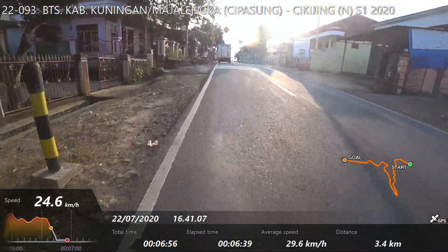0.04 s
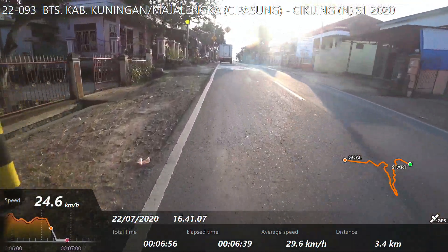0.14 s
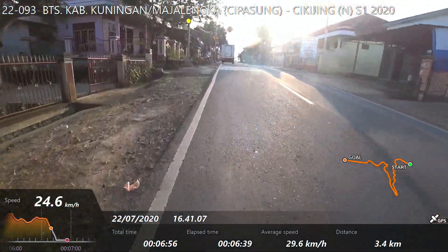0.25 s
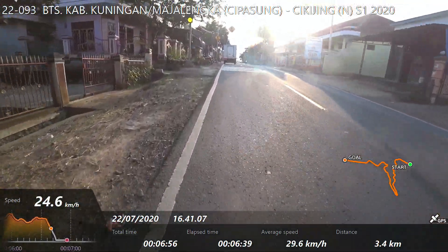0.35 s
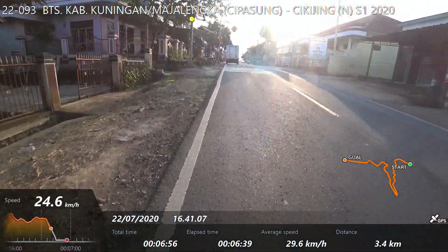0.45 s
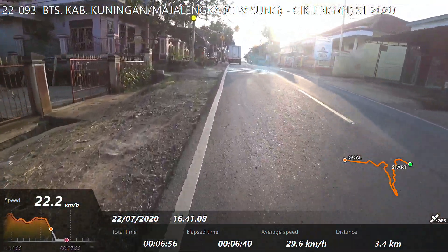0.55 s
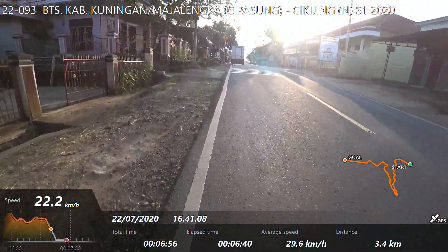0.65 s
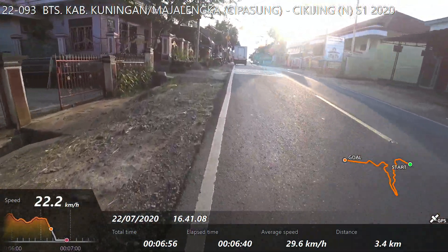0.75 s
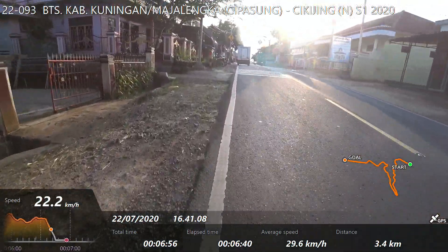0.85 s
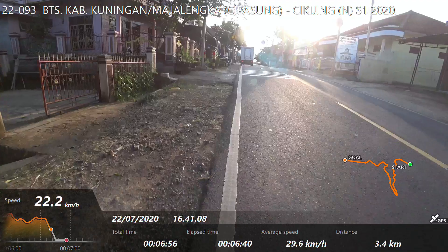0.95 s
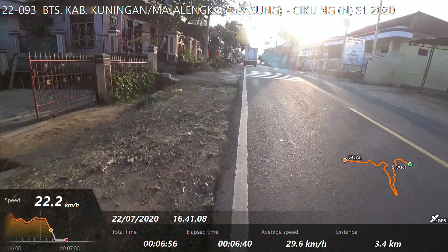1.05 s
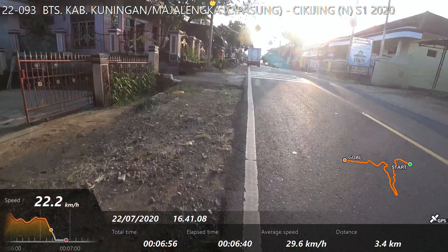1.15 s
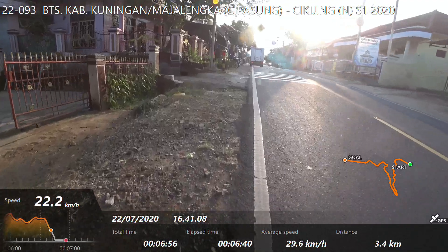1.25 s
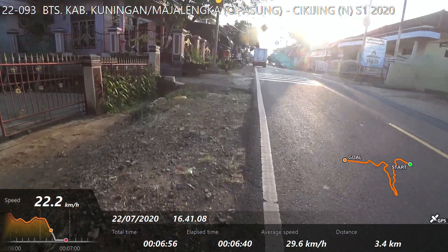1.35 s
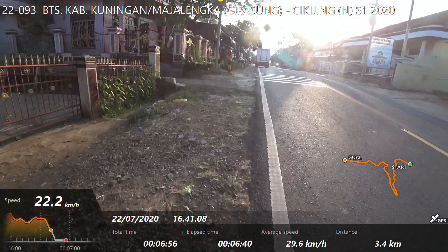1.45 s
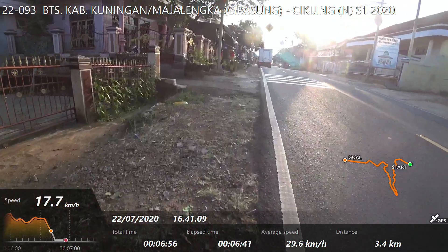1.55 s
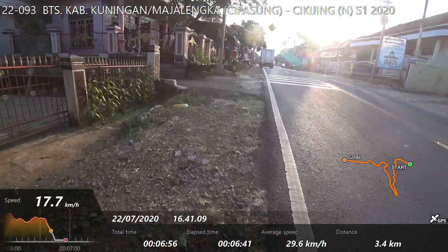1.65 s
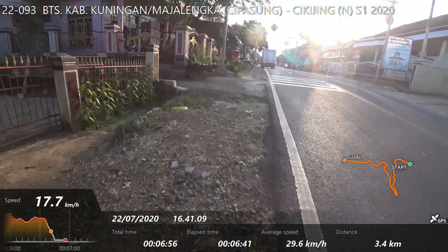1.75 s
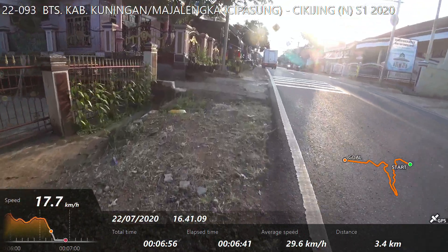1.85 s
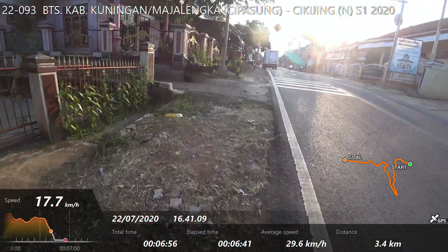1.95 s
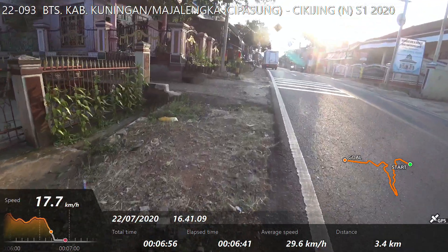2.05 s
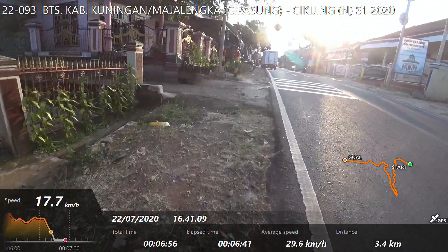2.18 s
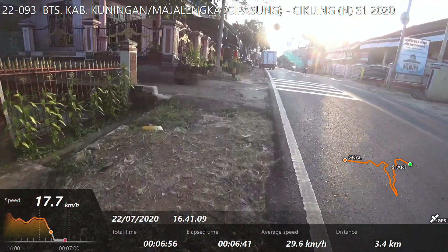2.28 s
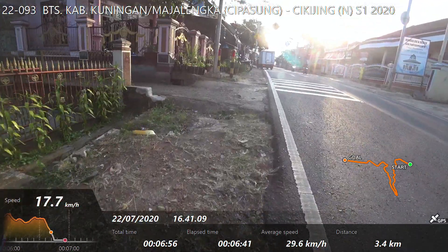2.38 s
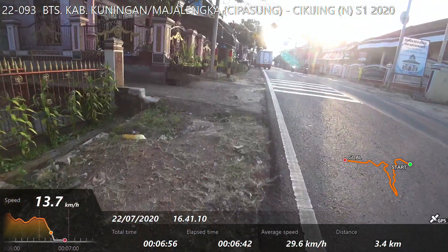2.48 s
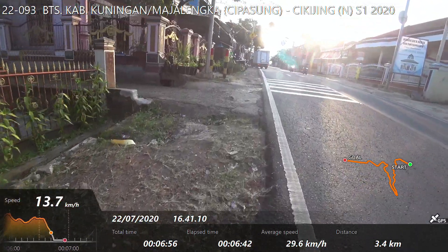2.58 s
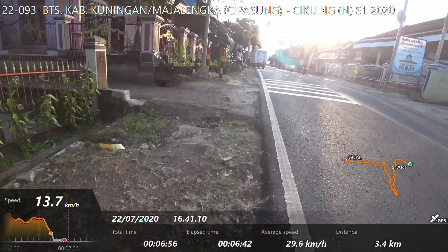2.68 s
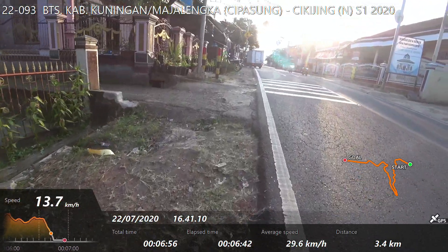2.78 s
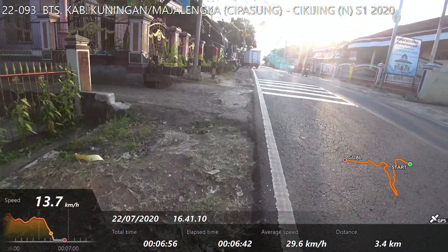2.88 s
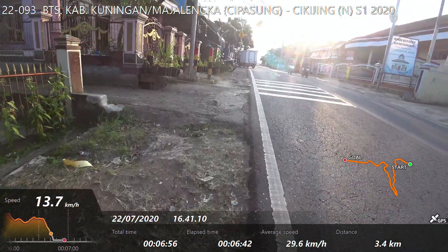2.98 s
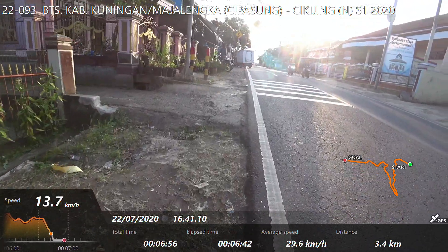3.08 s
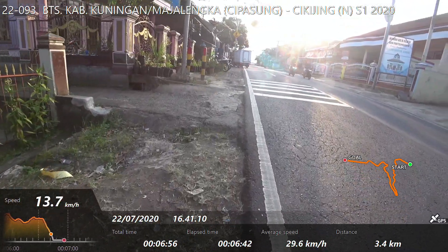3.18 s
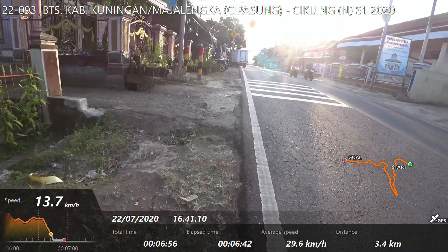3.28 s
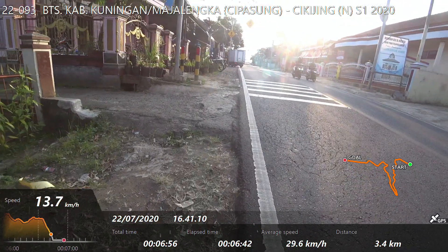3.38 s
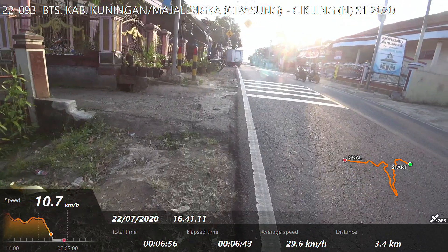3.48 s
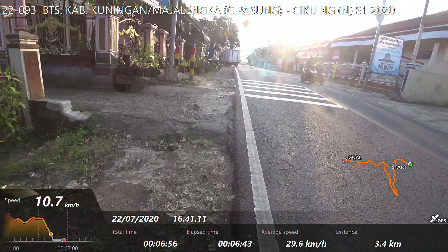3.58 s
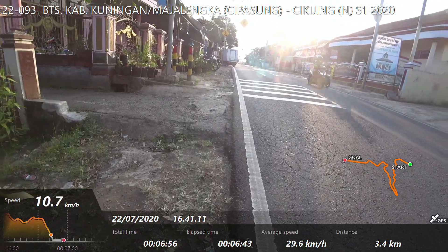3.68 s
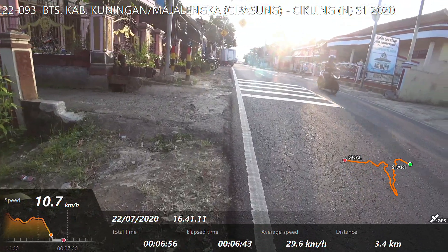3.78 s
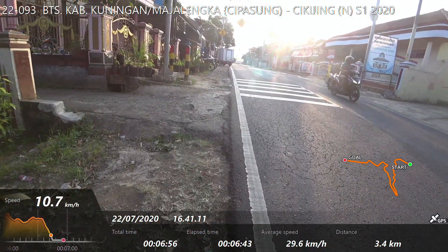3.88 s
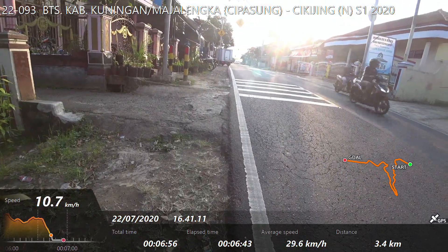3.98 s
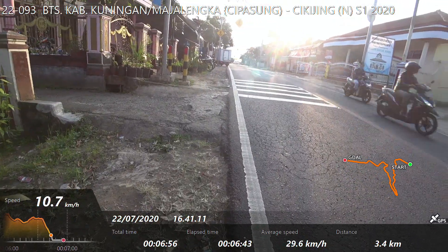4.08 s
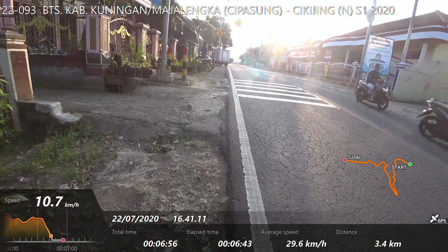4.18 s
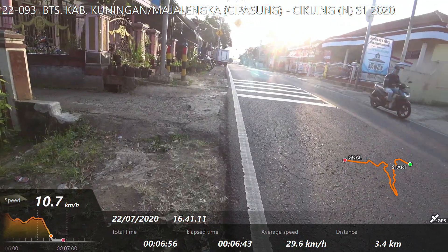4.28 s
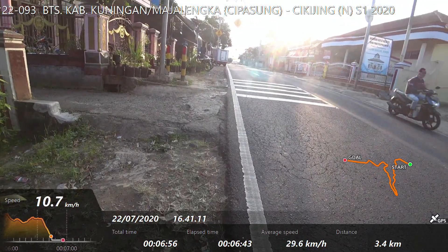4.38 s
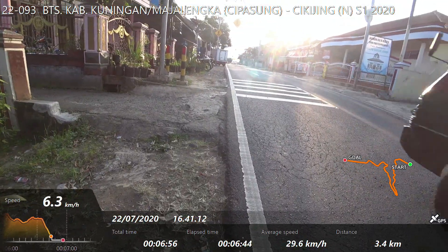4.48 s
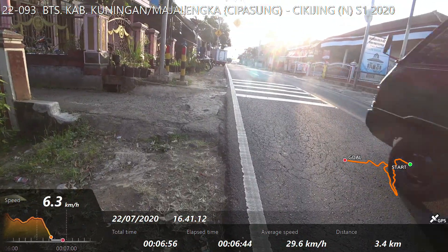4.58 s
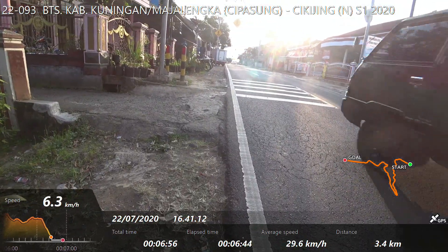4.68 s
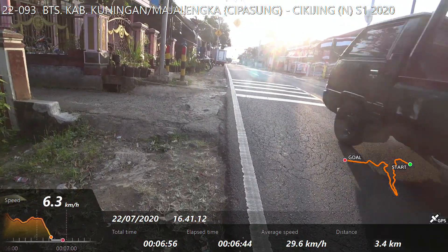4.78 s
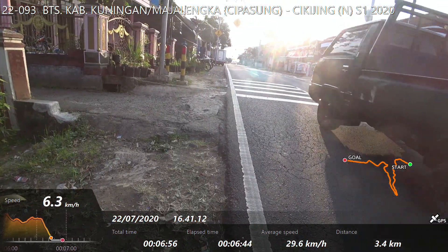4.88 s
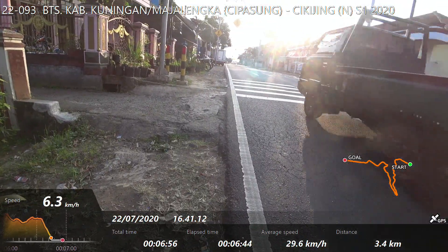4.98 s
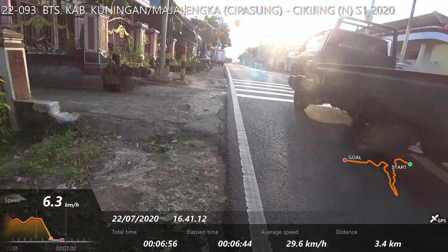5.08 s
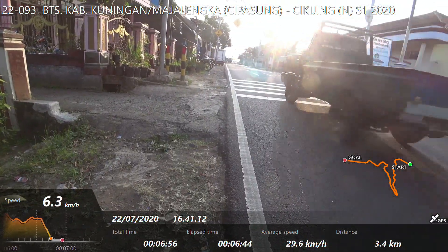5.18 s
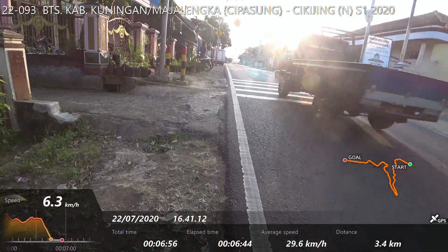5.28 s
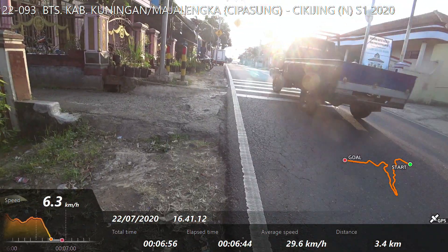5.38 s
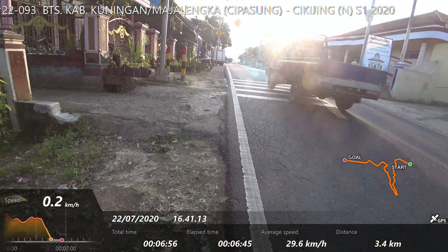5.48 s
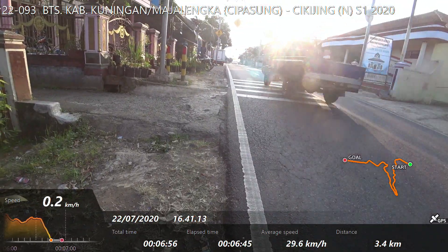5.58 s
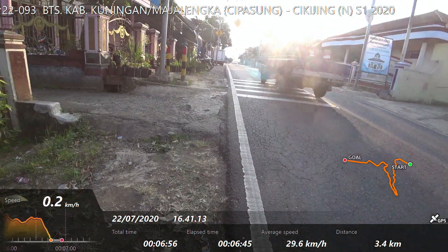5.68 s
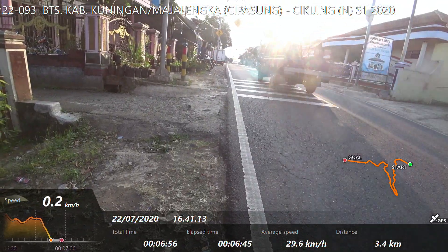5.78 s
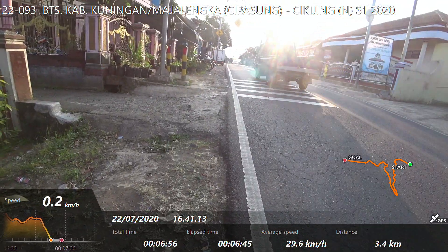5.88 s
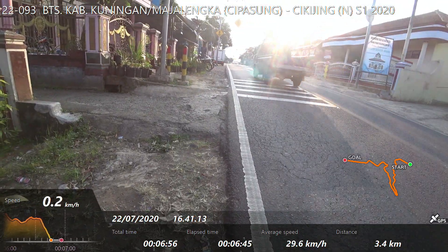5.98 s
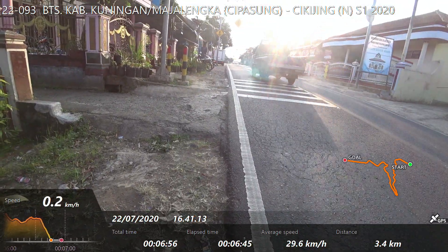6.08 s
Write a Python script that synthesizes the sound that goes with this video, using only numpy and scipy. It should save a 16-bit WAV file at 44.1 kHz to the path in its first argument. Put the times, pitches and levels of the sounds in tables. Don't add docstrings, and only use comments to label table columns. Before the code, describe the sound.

A small sealed camera rides on a two-wheeler on a village road, so sound is muffled, low and boxy. From 0 s an uneven idling throb mixes with tyre rumble, gravel crunch and a few early stone knocks. Around 1.0-1.2 s jolts rattle the housing and a loose clip ticks sharply. The hardest cluster of blunt knocks lands near 1.9-2.05 s, followed by more jolts, clip taps and a faint spring ring at 2.2-3 s. Shaking then eases, with one late knock near 3.9 s. A scooter approaches from about 3 s, buzzing loudest at 4.25 s, then drops slightly in pitch and fades. From 4 s a light truck from behind swells, its droning engine climbing steadily with howl and faint diesel clatter; tyres hiss closest near 5.2 s. It stays loud until 5.8 s, then the throttle lifts and the note falls and stutters at 6 s.

```python
import sys
import numpy as np
from scipy import signal
from scipy.fft import rfft, irfft, next_fast_len
from scipy.io import wavfile
from scipy.ndimage import uniform_filter1d, minimum_filter1d

SR = 44100
rng = np.random.default_rng(int(sys.argv[2]) if len(sys.argv) > 2 else 0)


def to_linear_factor(level_db):
    exponent = np.asarray(level_db, float) / 20
    return 10 ** exponent


def to_wav(s):
    ch = np.atleast_2d(s).T
    pcm = np.round(np.clip(ch, -1, 1) * 32767)
    wavfile.write(sys.argv[1], SR, pcm.astype(np.int16))


N = 270774
FFT_LEN = next_fast_len(N + 8000)
BINS = np.maximum(np.fft.rfftfreq(FFT_LEN, 1 / SR), 1)
TIME = np.arange(N) / SR


def rms_one(x):
    return x / np.sqrt(np.mean(x ** 2) + 1e-20)


def in_time(rows):
    s, *columns = np.transpose(rows)
    return [np.interp(TIME, s, c) for c in columns]


def at_hz(points, hz, axis=1):
    table = np.array(points)
    return np.interp(np.log(hz), np.log(table[:, 0]), table[:, axis])


def drift(rate):
    r = np.exp(-80 * np.pi * rate / SR)
    noise = rng.standard_normal(N // 40 + 2002)
    slow = signal.lfilter([1], [1, -2 * r, r * r], noise)[2000:]
    return np.interp(np.arange(N) / 40, np.arange(len(slow)), rms_one(slow))


def swells(rows):
    t = TIME[::40]
    power = sum(to_linear_factor(2 * db) / (1 + ((t - s) / length) ** 2) ** 2 for s, db, length in rows)
    return np.interp(TIME, t, power)


def resonance(x, hz, width):
    r = np.exp(-np.pi * width / SR)
    poles = [1, -2 * r * np.cos(2 * np.pi * hz / SR), r * r]
    return signal.lfilter([(1 - r * r) / 2, 0, (r * r - 1) / 2], poles, x + 1e-18)


def twice(x, hz, width, second_hz, second_width):
    return resonance(resonance(x, hz, width), second_hz, second_width)


def body(x, modes):
    return sum(to_linear_factor(db) / np.sqrt(width) * twice(x, hz, width, hz, width) for hz, width, db in modes)


def spectrum_of(x):
    return rfft(x, FFT_LEN)


def split(spectrum, tilt_db, lead):
    half = np.atleast_1d(to_linear_factor(tilt_db / 2) * np.exp(.5j * lead))
    return irfft(spectrum * np.array([half, 1 / half]), FFT_LEN)[:, :N]


# t/s, f/Hz, change/dB, length/s
CANCELS = [(1.7, 194, -17, 0.086), (2.5, 50, -10, 0.22), (3.8, 150, -12.5, 0.27), (3.72, 114, -12.5, 0.058),
           (3.94, 120, -9.5, 0.12), (3.86, 350, 6.5, 0.22), (3.64, 107.7, 4, 0.032), (5.92, 160, 6, .1),
           (4.5, 410, -6, 0.072), (4.15, 240, 3.5, .15), (3.6, 65, -4, 0.082), (5.08, 231, -12.5, 0.07),
           (5.8882, 250, -13, 0.025), (5.93, 79, -14, 0.033), (5.35, 560, 2.5, 0.08), (4.85, 371, 6, 0.18),
           (5.0, 610, 9, 0.18), (5.33, 243, 6.5, 0.065), (5.45, 485, -1.5, 0.15), (5.65, 650, 8, 0.23),
           (5.78, 425, -8.5, 0.072), (5.4, 405, -7, 0.1), (5.6, 273, 6, 0.036), (6.05, 230, -1, 0.087),
           (4.75, 350, 5, 0.11), (4.85, 570, -4.5, 0.18), (4.2, 430, -3, 0.1), (6.07, 520, -9, 0.05),
           (6.0, 385, 7.5, 0.061), (5.89, 575, 6.5, 0.027), (5.17, 545, -6.5, 0.05), (6.07, 150, 5, 0.073),
           (6.05, 225, -5.5, 0.025), (3.22, 350, 6.5, 0.075), (3.83, 355, -8, 0.19), (3.66, 237, 2, 0.1),
           (5.02, 530, 5.5, .07), (5.68, 592, -6.5, 0.11), (5.75, 510, 3.5, 0.087), (4.65, 840, 8.5, .06),
           (4.5, 440, 3.5, 0.13), (4.26, 220, -5, .04), (4.75, 145, -5, 0.08), (5.18, 390, 6, .06),
           (2, 73, 4.5, .12), (1.9, 180, 3, 0.065), (6.12, 380, 2, 0.034), (5.5, 325, 8.5, 0.086),
           (3.292, 237, 6.5, 0.049), (3.2, 475, 4, .1)]
CANCEL_OCTAVES = .17


def cancelled(hz):
    t, coarse = TIME[::40], hz[::40]
    change = 0
    for s, centre_hz, db, length in CANCELS:
        octaves_off = np.log2(coarse / centre_hz)
        change = change + db * np.exp(-((t - s) / length) ** 2 - (octaves_off / CANCEL_OCTAVES) ** 2)
    return np.interp(TIME, t, change)


# f/Hz, left minus right/dB, left lead/rad, diffuse share/0-1
PORTS = [(30, 2.5, 1, .05), (130, 3.5, 0.48, 0.18), (310, 3, 1.19, 0.06), (600, 2.5, 1.2, 0.09),
         (1110, 0.5, 1.32, 0.06), (2080, -1, 2.02, .15), (5000, -2, 2.37, 1), (11200, -1, 3, 1)]


def order(hz, multiple, db, wobble_db, rough):
    angle = 2 * np.pi * (multiple * np.cumsum(hz) / SR + rng.random() + rough * drift(10.0))
    side = np.array([[.5], [-.5]])
    tilt = to_linear_factor(side * at_hz(PORTS, multiple * hz))
    lead = side * at_hz(PORTS, multiple * hz, axis=2)
    return np.sqrt(2) * to_linear_factor(db + wobble_db * drift(7.0)) * tilt * np.sin(angle + lead)


def air_noise(colour, flicker_db):
    hiss = rfft(rng.standard_normal((3, FFT_LEN)))
    direct, left, right = hiss * to_linear_factor(at_hz(colour, BINS)) * (BINS < 11060)
    tilt_db, lead = at_hz(PORTS, BINS), at_hz(PORTS, BINS, axis=2)
    share = np.clip(at_hz(PORTS, BINS, axis=3), 0, 1)
    diffuse = split(np.sqrt(share) * np.array([left, right]), tilt_db, 0)
    directed = split(np.sqrt(1 - share) * direct, tilt_db, lead)
    return rms_one(directed + diffuse) * to_linear_factor(flicker_db * drift(6.3))


# t/s, firing f/Hz, level/dB
TRUCK = [(0, 62.09, -38), (1.3, 65.03, -34.5), (1.45, 59.8, -33.5), (1.55, 42.57, -34.5), (2, 47.25, -31.5),
         (2.4, 50.07, -28.5), (2.9, 47.41, -33), (3.4, 52.7, -32), (4.06, 62.3, -23.5),
         (4.22, 64.52, -24.5), (4.35, 66.46, -21.5), (4.61, 69.35, -19.5), (5.03, 75.37, -21.5),
         (5.35, 79.87, -18.5), (5.8, 85.5, -19), (5.96, 78.98, -21.5), (6.02, 75, -24), (6.14, 73, -21)]
# order, level when close/dB, share of the level swing
TRUCK_LOW = [(1, -22.5, 1.6), (2, -18, 0.98), (3, -19, 0.93)]
# order, level/dB
TRUCK_UPPER = [(1.5, -17), (2.5, -8.5), (3.5, -14), (4, 3), (4.5, -1.5), (5.5, -2), (6, 2), (6.5, -15),
               (7.5, -9.5), (8, -4), (8.5, -4), (9, -3), (10, -3), (11, -2.5)]
# f/Hz, level/dB
SILENCER = [(50, 0.5), (70, 4), (78, -4), (125, 0), (147, -3), (162, 0), (220, 1), (255, -7.5)]
# f/Hz, level/dB
INTAKE = [(335, -17.5), (362, -2.5), (395, -4.5), (425, -8), (495, -25.5), (525, -5), (555, -4),
          (578, -10.5), (600, -15.5)]
# f/Hz, level/dB
EXHAUST = [(100, 6), (250, -3), (290, -15.5), (330, -9), (372, -1.5), (410, -4), (450, -10), (500, -4.5),
           (550, -3.5), (600, -5), (640, -8), (726, -17.5), (900, -34.5)]
# t/s, change/dB, length/s
MISFIRES = [
    (6.001, -15, .013),
    (6.026, 6, .012),
    (6.082, -8, 0.0069),
    (6.089, 4.5, 0.016),
    (6.112, -9.5, 0.011),
]
TRUCK_CLOSE_DB = -20
INTAKE_DB, INTAKE_FOLLOWS, UPPER_DB = -21.5, 0.82, -7


def truck():
    hz, level = in_time(TRUCK)
    away = level - TRUCK_CLOSE_DB
    stumble = sum(db * np.exp(-((TIME - s) / length) ** 2) for s, db, length in MISFIRES)
    levels = {}
    for k, db, share in TRUCK_LOW:
        levels[k] = db + stumble + share * away + at_hz(SILENCER, k * hz) + cancelled(k * hz)
    for k in (5, 7):
        levels[k] = INTAKE_DB + INTAKE_FOLLOWS * away + at_hz(INTAKE, k * hz) + cancelled(k * hz)
    low = sum(order(hz, k, db, wobble_db=.7 + .25 * k, rough=.02 + .006 * k) for k, db in levels.items())
    high = 0
    for k, db in TRUCK_UPPER:
        upper_db = level + db + at_hz(EXHAUST, k * hz) + cancelled(k * hz)
        high = high + order(hz, k, upper_db, wobble_db=2.8, rough=.05)
    turns = np.cumsum(hz) / SR
    return low + to_linear_factor(UPPER_DB) * high, turns, away


# f/Hz, width/Hz, level/dB
BLOCK = [(2000, 350, 4), (3050, 300, -4), (4000, 350, 0), (5500, 400, -3), (6700, 400, -4), (8500, 400, -8)]
# t/s, level/dB, length/s
BAY = [
    (3.63, -68, .06),
    (4.33, -63, .06),
    (5.1, -61, .06),
    (5.24, -60, .07),
    (5.4, -63, .06),
    (5.65, -69, .15),
]
KNOCK_SPREAD_DB, KNOCK_S = 4.0, .003
KNOCK_STEADY = .5


def diesel_knock(turns):
    firing = turns.astype(int)
    strength = to_linear_factor(KNOCK_SPREAD_DB * rng.standard_normal(firing[-1] + 1))[firing]
    since = (turns - firing) / np.gradient(turns) / SR
    burst = rng.standard_normal(N) * (KNOCK_STEADY + strength * np.exp(-since / KNOCK_S))
    rung = sum(body(burst, [mode]) * to_linear_factor(2.5 * drift(12.0)) for mode in BLOCK)
    rung = rms_one(rung) * np.sqrt(2 * swells(BAY))
    return split(spectrum_of(rung), at_hz(PORTS, BINS), at_hz(PORTS, BINS, axis=2))


# t/s, firing f/Hz, level/dB
SCOOTER = [
    (2.0, 58.37, -56),
    (2.5, 58.81, -40.5),
    (3.2, 59.4, -35),
    (3.601, 59.26, -28),
    (4, 58.9, -26),
    (4.25, 58.5, -22),
    (4.401, 58.3, -34),
    (4.7, 56.54, -34),
    (5.3, 56.1, -90.5),
]
# order, level/dB
SCOOTER_ORDERS = [(1, -21.5), (2, -0.5), (3, -6), (4, 2.5), (5, -18.5), (6, -3.5), (7, -13.5), (8, -5),
                  (9, -12), (10, -29)]
# t/s, level/dB
BOOM = [(2.0, -55), (3.3, -47), (3.6, -30.5), (4.0, -31), (4.25, -37.5), (4.8, -33.5), (5.05, -34.5),
        (5.4, -38), (5.7, -48.5), (6.14, -55)]
BOOM_SECOND_DB = -3


def scooter():
    hz, level = in_time(SCOOTER)
    boom, = in_time(BOOM)
    levels = {k: level + db for k, db in SCOOTER_ORDERS}
    levels[1] = boom
    levels[2] = np.maximum(levels[2], boom + BOOM_SECOND_DB)
    return sum(order(hz, k, db + cancelled(k * hz), wobble_db=1.0, rough=.02) for k, db in levels.items())


# f/Hz, level/dB per Hz
RASP = [(650, -32), (780, -1.5), (900, 4.5), (1050, -7), (1300, -34), (2200, -70)]
RASP_DB, RASP_GATE = -20.5, .6


def scooter_rasp():
    hz, level = in_time(SCOOTER)
    gate = 1 + RASP_GATE * np.cos(2 * np.pi * np.cumsum(hz) / SR)
    return to_linear_factor(level + RASP_DB) * gate * air_noise(RASP, flicker_db=1.5)


# t/s, firing f/Hz, level/dB
IDLE = [(0, 37.73, -29.5), (.22, 35.15, -35), (.49, 35.6, -30), (.7, 37.25, -35), (.88, 35.28, -29.5),
        (1.25, 34.97, -34), (1.6, 37.23, -34.5), (2.3, 38.29, -36), (2.7, 38.34, -26.5),
        (3.27, 38.57, -37.5), (3.65, 35.8, -36), (4.05, 31.02, -34.5), (4.6, 33.02, -44), (4.9, 30.92, -35),
        (6.14, 30, -61)]
# order, level/dB
IDLE_ORDERS = [(1, 1.5), (2, -5.5), (3, -5), (4, -8)]
# t/s, level/dB, length/s
BOUNCES = [
    (.6, -28, 0.055),
    (.77, -26.5, 0.052),
    (1.17, -28.5, .08),
    (1.6, -26, 0.023),
    (2.69, -33.5, 0.071),
    (2.93, -31, 0.06),
    (3.27, -37.5, 0.026),
    (3.65, -32, 0.055),
    (4.3, -36, 0.027),
    (5.33, -40.5, 0.047),
]


def own_engine():
    hz, level = in_time(IDLE)
    surging = np.sqrt(to_linear_factor(2 * level) + swells(BOUNCES))
    return surging * sum(order(hz, k, db, wobble_db=3.5, rough=0.052) for k, db in IDLE_ORDERS)


STAND_S, SETTLE_DB_PER_S = 4.3, -8


def rolling():
    return to_linear_factor(SETTLE_DB_PER_S * np.maximum(TIME - STAND_S, 0))


# t/s, frame level/dB, small rattles level/dB
JOLTS = [(0.47, -17.5, -41.5), (0.572, -31, -42.5), (0.911, -20.5, -67), (1.01, -32.5, -39),
         (1.1, -16, -40.5), (1.155, -15, -46), (1.265, -17.5, -44), (1.63, -23.5, -66), (1.687, -17.5, -52),
         (1.727, -28.5, -55), (1.78, -29.5, -48), (1.83, -32.5, -54.5), (1.866, -12.5, -45),
         (2.003, -38, -60), (2.047, -25.5, -67), (2.11, -38.5, -62), (2.224, -18, -35), (2.27, -19.5, -42),
         (2.481, -18.5, -43), (2.62, -14, -33), (2.655, -14.5, -37), (2.726, -25, -40.5), (2.772, -19, -60),
         (2.84, -24, -53)]
# f/Hz, width/Hz, level/dB
FRAME = [(85.6, 35, -9), (131, 54, -8.5), (258, 270, -8), (346, 110, -4.5), (416, 98, -13),
         (487.2, 33, -4.5), (558, 64, -7), (700, 59, -18.5)]
# f/Hz, width/Hz, level/dB
BRACKET = [(715.6, 32, 15), (798, 30, -1), (860, 170, -22.5)]
# f/Hz, width/Hz, level/dB
RATTLES = [(784, 83, -4), (1024, 230, 9), (1120, 200, -6.5), (1355, 150, -3.5), (1370, 100, -2.5),
           (1390, 350, -8), (1970, 440, -17.5), (2600, 600, -13.5)]
# f/Hz, left lead/rad
SHAKE_PHASE = [(60, 0.51), (130, 2.8), (300, 2.23), (500, 2.45), (750, 2.96), (1000, 2.48), (1200, 2.65),
               (1400, 2.32), (2500, 1.6)]
SHAKE_DB, BRACKET_DB = -27, -6


def housing():
    rough = rolling() * to_linear_factor(SHAKE_DB + 0.5 * drift(30))
    parts = [(FRAME, -1.5, .025), (BRACKET, -12, .018), (RATTLES, -18, .03)]   # modes, steady dB, decay s
    out = 0
    for k, (modes, steady_db, decay_s) in enumerate(parts):
        kicks = np.zeros(N)
        for s, db, rattle_db in JOLTS:
            kicks[round(s * SR)] = to_linear_factor([db, db + BRACKET_DB, rattle_db][k])
        fall, rise = np.exp(-1 / (decay_s * SR)), np.exp(-1 / (0.0025 * SR))
        push = signal.lfilter([1 - rise], np.convolve([1, -fall], [1, -rise]), kicks + 1e-18)
        push = push / (1 - rise) * 0.008
        grain = rng.standard_normal(N)
        scale = np.sqrt(np.mean(body(grain, modes) ** 2))
        out = out + body(grain * (to_linear_factor(steady_db) * rough + push), modes) / scale
    damped = spectrum_of(out) / (1 + (BINS / 1900) ** 4)
    return split(damped, 0.3, at_hz(SHAKE_PHASE, BINS))


# t/s, peak level/dB, ring f/Hz, direction/+-1
KNOCKS = [(.108, -18, 380, -1), (.258, -22, 480, -1), (.288, -17.5, 476, -1), (.318, -20, 480, -1),
          (1.126, -22.5, 440, -1), (1.171, -20, 490, -1), (1.82, -16, 406, -1), (1.870, -16.5, 379.7, -1),
          (1.8805, -18, 302.6, -1), (1.909, -7.5, 467, -1), (1.919, -10.5, 513, -1), (1.927, -16, 503, -1),
          (1.936, -7.5, 258, -1), (1.9945, -6.5, 416, 1), (2.04, -13.5, 400, -1), (2.053, -12, 400, -1),
          (2.226, -13.5, 440, -1), (2.63, -14.5, 442, -1), (2.73, -24, 438, -1), (2.911, -23, 360, -1),
          (2.996, -15.5, 480, -1), (3.876, -13.5, 480, -1)]


def knocks():
    rung = np.zeros(FFT_LEN)
    blow = 1.0 * (np.arange(2000) == 0)
    for s, db, hz, direction in KNOCKS:
        ring = resonance(twice(blow, hz, 0.64 * hz, hz, 0.64 * hz), 190, 440)
        at = round(s * SR)
        rung[at:at + len(blow)] += np.sign(direction) * to_linear_factor(db) * ring / np.abs(ring).max()
    soft = rfft(rung) / (1 + (BINS / 850) ** 6)
    return split(soft, 1.5, 1.6)


# t/s, peak level/dB, ring f/Hz, thud level/dB
TICKS = [(1.0580, -32.5, 4430, -3), (1.0585, -40.5, 6200, -30), (1.0602, -43, 6000, -30),
         (1.0900, -50, 6000, -10), (1.0908, -37, 8050, -13.5), (1.0923, -35, 5900, 4),
         (1.112, -50, 3500, -12), (1.0918, -34.5, 4000, -30), (1.1199, -44.5, 6510, -1),
         (1.1205, -45, 7470, -8), (1.1259, -30, 4160, 0), (1.1265, -38, 6300, -30),
         (1.1296, -51.5, 9000, -12), (1.1617, -44, 5400, -30), (1.1616, -43, 3600, 9),
         (1.162, -48, 7000, -12), (1.1696, -53, 7500, -12), (1.1799, -54, 5480, -11),
         (1.1944, -40.5, 7030, -30), (1.195, -44.5, 4530, 10.5), (1.1955, -40, 2100, -30),
         (1.2125, -52, 2800, -10), (1.2, -52.5, 6500, 5), (2.634, -47, 1900, -10), (2.668, -56, 5600, -12),
         (2.6768, -44, 3900, -4.5), (2.6775, -52, 7500, -12), (2.6838, -37, 3900, -12),
         (2.6845, -44, 6800, -12), (2.702, -53, 6000, -12), (2.7113, -38, 3900, -3),
         (2.712, -50, 7000, -12), (5.315, -50, 2800, -26), (5.365, -52, 2600, -27),
         (5.3845, -46, 2600, -27), (5.435, -51, 3000, -26), (5.9315, -50.5, 2600, -19.5),
         (5.969, -49.5, 2600, -23)]
TAP_Q, TAP_CUT_HZ = 1.9, 13000
SCUFF_DB, SCUFF_S = -13.5, 0.0018


def ticks():
    out, thud = np.zeros(N), np.zeros(N)
    n = np.arange(-400, 400)
    hit = 1.0 * (n == -4)
    for s, db, hz, thud_db in TICKS:
        at = round(s * SR)
        tap = twice(hit, hz, hz / TAP_Q, hz, hz / TAP_Q)
        tap += .07 * (hz / 4500) ** 2 * twice(hit, 9000, 7000, 9000, 9000)
        scuff = 1.5 * twice(rng.standard_normal(len(n)), hz, hz, hz, 1.4 * hz)
        scuff *= np.exp(-np.abs(n - 20) / (SCUFF_S * SR))
        out[at + n] += to_linear_factor(db + 3.5) * (tap / np.abs(tap).max() + to_linear_factor(SCUFF_DB) * scuff)
        thud[at + 30] = to_linear_factor(db + thud_db + 43)
    knock = 1.46 * twice(thud, 1000, 130, 930, 120)
    knock += 0.27 * twice(thud, 1420, 200, 1380, 200)
    knock += 0.13 * twice(thud, 1830, 300, 1850, 300)
    click = spectrum_of(out) / (1 + (BINS / TAP_CUT_HZ) ** 5)
    return split(click, -2.4, 1.5) + split(1.7 * spectrum_of(knock), -2.0, 2.0)


# t/s, level/dB, length/s
RINGS = [(.5, -56.5, .04), (1.03, -53.5, .04), (1.13, -53.5, 0.055), (1.75, -57.5, .08),
         (2.26, -57.5, 0.037), (2.51, -53.5, .04), (2.56, -57, .03), (2.64, -46, .015), (2.685, -48, .02),
         (2.745, -45, .02), (2.795, -46, .025), (2.85, -47, .015)]
SPRING_HZ, SPRING_WANDER_HZ = 1380, 14


def spring():
    hz = SPRING_HZ + SPRING_WANDER_HZ * drift(9.0)
    sung = np.sqrt(2) * np.sin(2 * np.pi * np.cumsum(hz) / SR) * to_linear_factor(1.5 * drift(25.0))
    return split(spectrum_of(sung * np.sqrt(swells(RINGS))), .6, at_hz(SHAKE_PHASE, BINS))


# t/s, level/dB, length/s
CHAFES = [(1.02, -64, .03), (1.105, -68, .02), (1.21, -63, .015), (1.872, -60, .012), (1.892, -60, .012),
          (2.04, -64, .01), (2.24, -68, .04), (2.632, -60, .006), (2.73, -64, .015), (2.795, -64, .02),
          (2.84, -70, .02)]
# f/Hz, level/dB per Hz
CHAFE_COLOUR = [(1300, -25), (1800, -1.5), (2500, 0.5), (3000, -6.5), (3600, -20), (5000, -45)]


def chafe():
    rub = irfft(rfft(rng.standard_normal(FFT_LEN)) * to_linear_factor(at_hz(CHAFE_COLOUR, BINS)), FFT_LEN)[:N]
    rub = rms_one(rub) * np.sqrt(2 * swells(CHAFES)) * to_linear_factor(1.5 * drift(60.0))
    return split(spectrum_of(rub), -1.0, 1.8)


def patchy(x, depth_db):
    edges = 1400 * 2 ** np.arange(0, 3.1, 1 / 3)
    out = 0
    for low, high in zip(edges, edges[1:]):
        band = signal.butter(2, [low, high], "band", fs=SR, output="sos")
        out = out + signal.sosfilt(band, x) * to_linear_factor(depth_db * drift(9.5))
    return out


# t nearest/s, hiss level/dB, time to travel the gap/s
PASSES = [
    (3.63, -54, 0.08),
    (3.9, -54, 0.49),
    (4.16, -52, 0.1),
    (4.32, -48, 0.08),
    (4.8, -50.5, 0.48),
    (5.1, -48, 0.096),
    (5.24, -47, 0.1),
    (5.55, -50, 0.28),
    (5.76, -55, .07),
]
# t/s, roar level/dB, hiss level/dB, length/s
GRAVEL = [
    (0, -26, -53, 0.031),
    (0.337, -38, -74, 0.17),
    (0.752, -52, -71, .08),
    (1.77, -39, -66, 0.055),
    (1.02, -34.5, -62, 0.32),
    (1.96, -25, -79, 0.21),
    (2.294, -41, -57, 0.12),
    (2.805, -28.5, -63, 0.43),
]
# f/Hz, level/dB per Hz
RUMBLE = [(20, 6), (35, 8.5), (70, 16.5), (130, 14.5), (220, 13.5), (320, 9), (450, -44)]
ROAR = [(150, -36), (250, -3), (285, -2.5), (355, -4), (544, -2), (846, -21.5), (1250, -35.5), (1410, -32),
        (1600, -70), (2080, -84), (3520, -120)]
CLATTER = [(1100, -42), (1400, -3), (1600, -1), (1900, 3.5), (2150, 2.5), (2350, -8.5), (2800, -36.5)]
HISS = [(1500, -17.5), (2400, 2), (3200, 4.5), (4200, 2), (5500, -2.5), (6800, -6.5), (8500, -18),
        (9500, -24), (11000, -40.5)]
RUMBLE_DB, ROAR_DB, CLATTER_DB, HISS_DB = -29.5, -35.5, -66.5, -69.5
TRUCK_ROAR_DB, TRUCK_ROAR_FOLLOWS, TRUCK_CLATTER_DB = -26, 0.41, -54.5
PASS_ROAR_DB, PASS_CLATTER_DB, GRAVEL_CLATTER_DB = 25.5, -4, -4
HISS_PATCHY_DB = .6


def traffic(turns, away):
    passing = swells(PASSES)
    crunch = swells([(s, db, length) for s, db, _, length in GRAVEL])
    spray = swells([(s, db, length) for s, _, db, length in GRAVEL])
    gate = 1 + 0.2 * np.cos(2 * np.pi * turns)
    roar_power = to_linear_factor(2 * ROAR_DB) + to_linear_factor(2 * (TRUCK_ROAR_DB + TRUCK_ROAR_FOLLOWS * away))
    roar_power += to_linear_factor(2 * PASS_ROAR_DB) * passing + crunch
    clatter_power = to_linear_factor(2 * CLATTER_DB) + to_linear_factor(2 * (TRUCK_CLATTER_DB + away))
    clatter_power += to_linear_factor(2 * PASS_CLATTER_DB) * passing + to_linear_factor(2 * GRAVEL_CLATTER_DB) * spray
    hiss_power = to_linear_factor(2 * HISS_DB) + passing + spray
    rumble = to_linear_factor(RUMBLE_DB) * air_noise(RUMBLE, flicker_db=0.84)
    roar = np.sqrt(roar_power) * air_noise(ROAR, flicker_db=0.38)
    clatter = np.sqrt(clatter_power) * gate * air_noise(CLATTER, flicker_db=.8)
    hiss = np.sqrt(hiss_power) * gate * patchy(air_noise(HISS, flicker_db=.8), HISS_PATCHY_DB)
    return rumble + roar + clatter + hiss


# t/s, level/dB, length/s
GRIT = [
    (.74, -70, .05),
    (1.12, -69, 0.036),
    (1.77, -65, .04),
    (2.69, -72.5, .03),
    (5.12, -68.5, .05),
    (5.25, -64.5, 0.055),
    (5.7, -72.5, .1),
]
# f/Hz, level/dB per Hz
GRIT_COLOUR = [(4000, -31.5), (5500, -3), (7500, 0), (9500, -2), (11000, -8)]


def grit():
    return np.sqrt(swells(GRIT)) * air_noise(GRIT_COLOUR, flicker_db=1.5)


# f/Hz, level/dB per Hz
SWAY_COLOUR = [(6, -52.5), (14, -1), (24, 17), (32, 19.5), (45, -42)]
SWAY_DB, SWAY_BOUNCE_DB = -40, -16


def sway():
    power = to_linear_factor(2 * SWAY_DB) * rolling() ** 2 + to_linear_factor(2 * SWAY_BOUNCE_DB) * swells(BOUNCES)
    return np.sqrt(power) * air_noise(SWAY_COLOUR, flicker_db=0.0)


# f/Hz, level/dB per Hz
FAR_HISS = [(1410, -36.5), (2400, 5), (2750, -1), (5200, -8), (8330, -8), (10200, -17), (11200, -29),
            (14600, -48), (22000, -120)]
FAR_DB = -64


def far_hiss():
    return to_linear_factor(FAR_DB) * air_noise(FAR_HISS, flicker_db=1.2)


def scene():
    engine, turns, away = truck()
    engines = engine + diesel_knock(turns) + scooter() + scooter_rasp() + own_engine()
    shaking = housing() + knocks() + ticks() + spring() + chafe()
    air = traffic(turns, away) + grit() + sway() + far_hiss()
    return engines + shaking + air


CEILING, LIMIT_S = .7, .004


def limited(x):
    span = round(LIMIT_S * SR)
    room = np.minimum(CEILING / (np.abs(x).max(axis=0) + 1e-9), 1)
    return x * uniform_filter1d(minimum_filter1d(room, size=2 * span + 1), size=span)


def roll_off(x):
    return signal.sosfilt(signal.butter(12, 16000, fs=SR, output="sos"), x)


def record(dry):
    opening = np.minimum(TIME / .002, 1)
    closing = np.minimum(.2 + TIME[::-1] / .01, 1)
    return roll_off(limited(0.89 * dry) * opening * closing)


dry = scene()
out = record(dry)
to_wav(out)
```